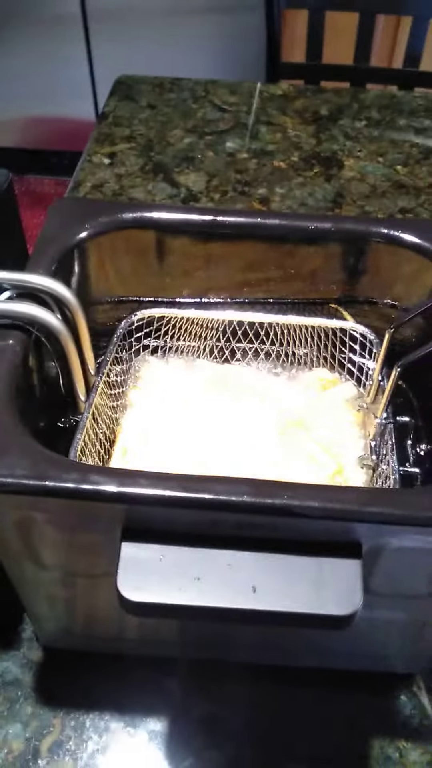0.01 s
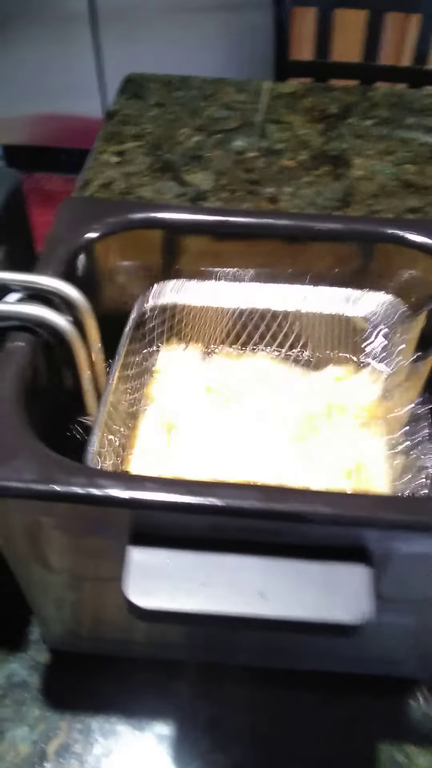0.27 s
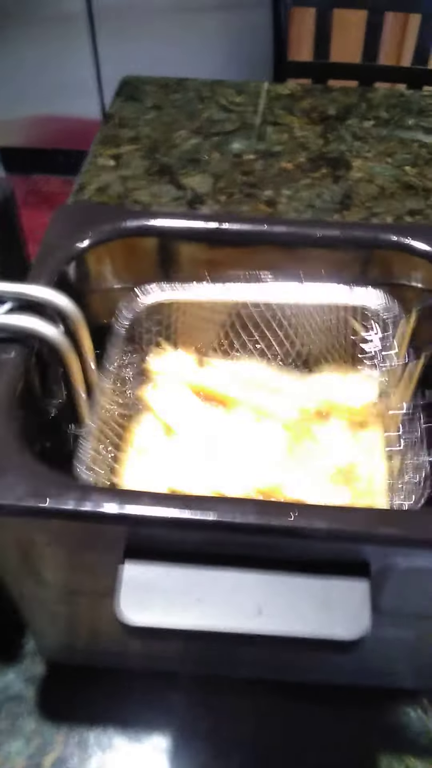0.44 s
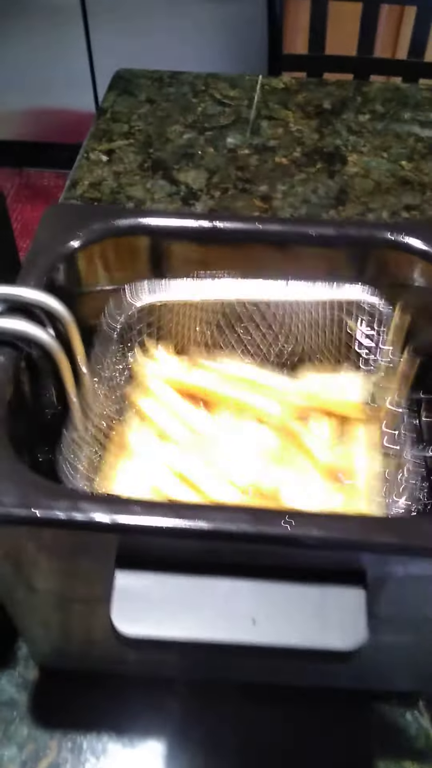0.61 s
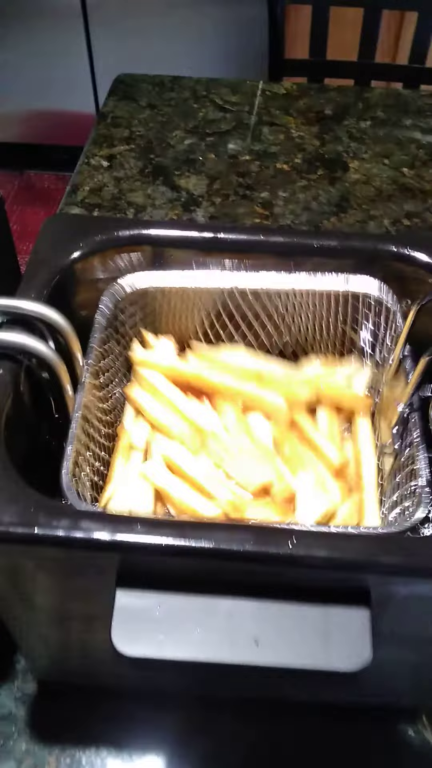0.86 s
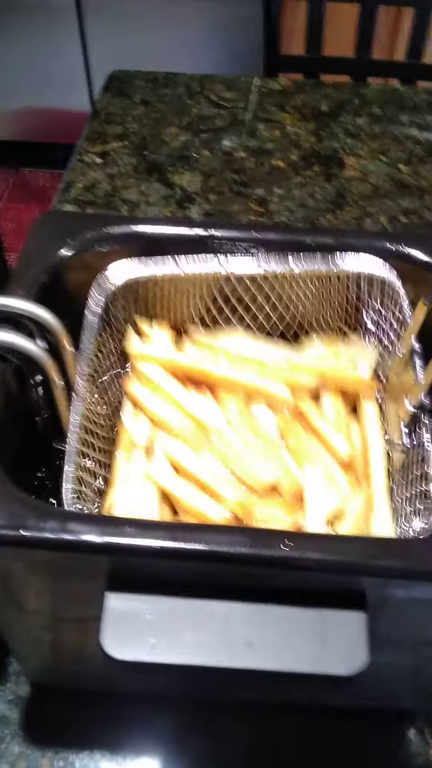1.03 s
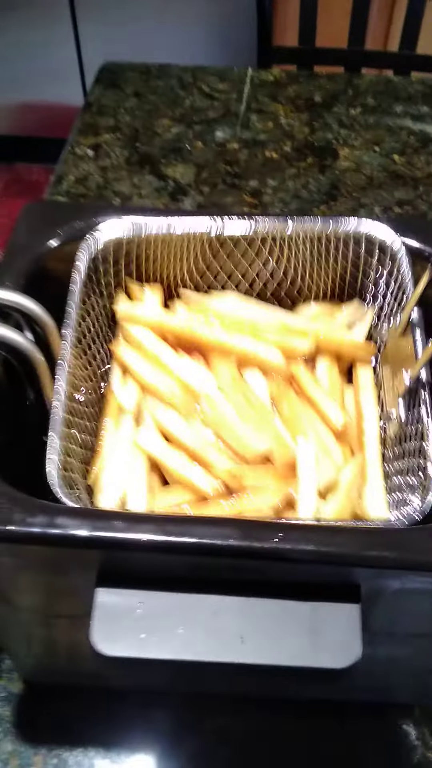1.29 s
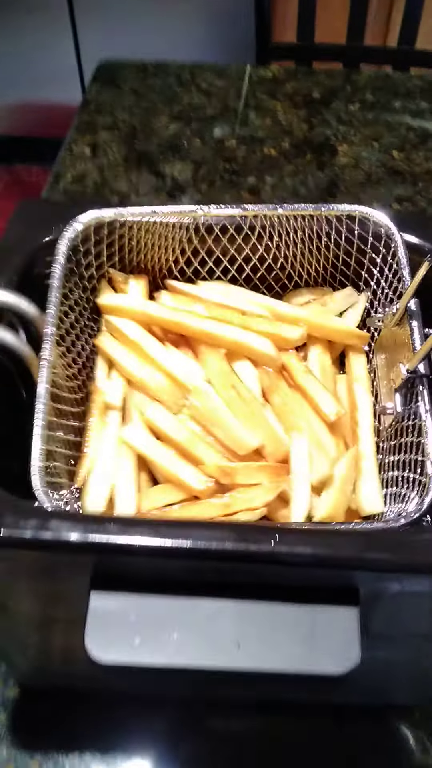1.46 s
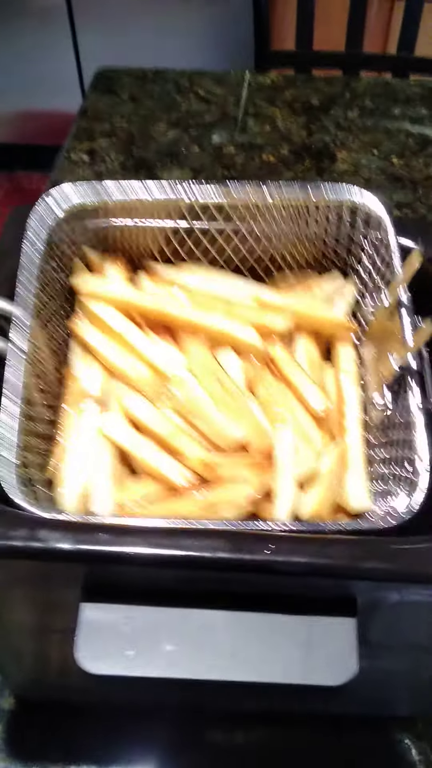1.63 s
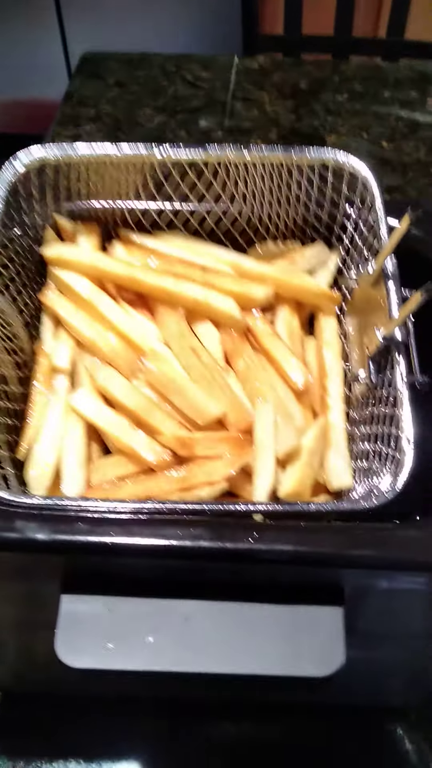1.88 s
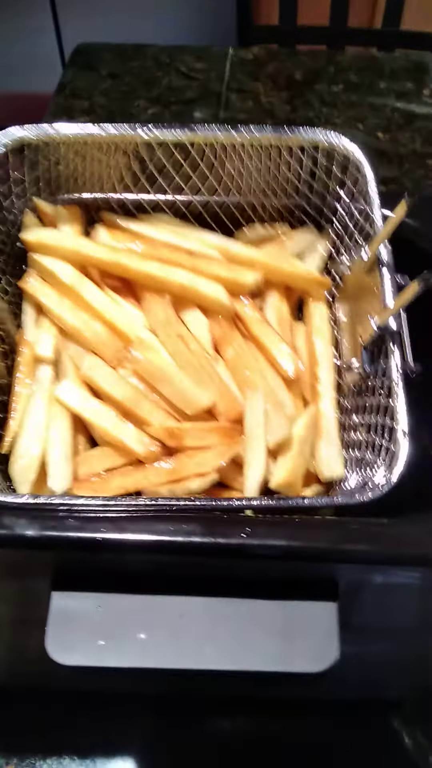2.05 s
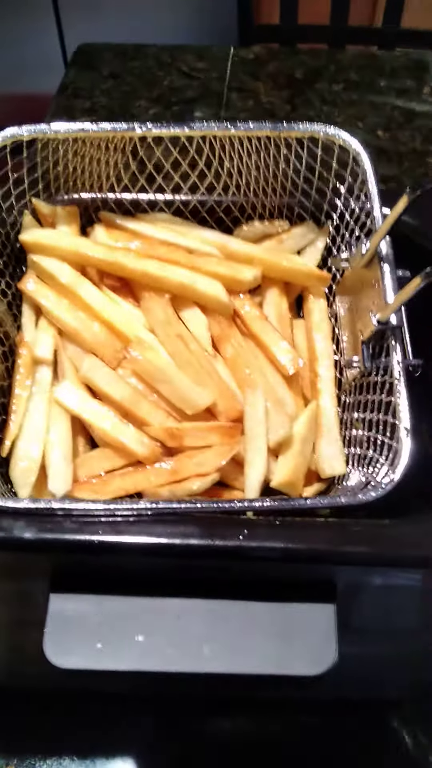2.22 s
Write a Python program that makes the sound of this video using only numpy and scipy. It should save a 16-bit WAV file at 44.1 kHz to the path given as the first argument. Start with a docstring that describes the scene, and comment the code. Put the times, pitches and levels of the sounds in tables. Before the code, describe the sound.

A wire fry basket knocks and rattles against a small steel fryer, close by in a kitchen, from about 0.2 to 1 second, its mesh buzzing and clicking. At 1.2 seconds the handle scrapes briefly, followed by two soft, low bumps and two light knocks near 1.5 seconds. Around 2 seconds the handle wires tick and ring. Hot oil hisses faintly throughout.

```python
"""A wire basket of fries is shaken in a small fryer, close by in a kitchen. Hot oil hisses throughout.
For the first second the basket knocks about: each knock is a quick chatter of tiny hits that rings
the steel tub and the rim and sets the mesh buzzing, with small clicks and slides among the knocks.
Then it is lifted out: a handle wire scrapes, two soft handling bumps follow, then two light knocks.
Last, around two seconds in, the handle wires tick and ring."""
import sys
import numpy as np
from scipy import signal
from scipy.fft import rfft, irfft, next_fast_len
from scipy.io import wavfile

SR = 44100
rng = np.random.default_rng(int(sys.argv[2]) if len(sys.argv) > 2 else 0)


def put_to_file(sound):
    """Save the sound as 16-bit audio at rate SR, in the file named by the first command-line argument."""
    columns = np.atleast_2d(sound).T  # one column per channel
    safe = np.clip(columns, -1, 1)
    whole_steps = np.round(safe * 32767)
    wavfile.write(sys.argv[1], SR, whole_steps.astype(np.int16))


N = 101429
T = np.arange(SR // 2) / SR  # seconds since the start of one short sound

# Basket knocks: start_s, tub_db, tub_hz, wall_db, rim_db, rim_hz, mesh_db, thud_db, hold_s
BASKET_KNOCKS = [(0.001, -62.5, 570, -69.5, -76.5, 2230, -96, -84, 0.058),
                 (0.2052, -40, 520, -47, -41, 2760, -47.5, -81, 0.011),
                 (0.2221, -36.5, 520, -43, -51, 2450, -46.5, -57, 0.013),
                 (0.256, -55, 530, -59.5, -80, 2460, -65, -70, 0.027),
                 (0.323, -47.5, 710, -53.5, -43, 2110, -41, -89, 0.0045),
                 (0.331, -40, 668, -67, -59, 2100, -54.5, -60.5, 0.013),
                 (0.4343, -31.5, 600, -39, -41.5, 2700, -41, -68, 0.0082),
                 (0.483, -78, 660, -50, -61, 2380, -58, -77, 0.012),
                 (0.555, -50, 635, -75, -45, 2250, -35.5, -61.5, 0.0069),
                 (0.567, -40.5, 690, -50.5, -52.5, 2610, -51.5, -63.5, 0.035),
                 (0.607, -42.5, 630, -59, -53.5, 2640, -58, -60, 0.015),
                 (0.6622, -30.5, 609, -39.5, -42, 2820, -36, -56.5, 0.0061),
                 (0.732, -59, 620, -46.5, -63, 2660, -77, -69.5, 0.0035),
                 (0.770, -79, 706, -60.5, -60, 2550, -84, -100, 0.021),
                 (0.956, -44, 660, -51.5, -53, 2840, -62, -76, 0.0078),
                 (0.9755, -41.5, 670, -46.5, -47.5, 2710, -57, -86, 0.0076),
                 (0.996, -48, 590, -58.5, -64, 2420, -64, -82, 0.0026),
                 (1.032, -79, 630, -63.5, -66, 2700, -66, -69.5, 0.012),
                 (1.508, -57.5, 610, -69, -65.5, 2790, -90, -68, 0.016),
                 (1.535, -59, 457, -80, -65, 2230, -71.5, -68, 0.011)]
# Mesh wires slipping past each other: start_s, level_db, pitch_hz, width_hz
MESH_CLICKS = [(0.206, -57, 13100, 5000), (0.224, -45.5, 4300, 1100), (0.434, -59, 14000, 3500),
               (0.559, -43.5, 9800, 2200), (0.9757, -44.5, 7720, 1840)]
# Mesh and fries sliding: start_s, hold_s, level_db, pitch_hz, width_hz
LIGHT_SLIDES = [(0.196, 0.006, -58, 2640, 705), (0.949, 0.03, -59.5, 7870, 1710),
                (1.176, 0.0033, -56.5, 6170, 1510), (1.18, 0.031, -64.5, 7840, 2480),
                (1.504, 0.056, -65, 970, 338), (0.699, 0.25, -72.5, 2430, 1080),
                (1.583, 0.12, -80, 1080, 200)]
# Handle scrapes and ticks: start_s, level_db, pitch_hz, hold_s, ring_db, fizz_db, wall_db
HANDLE_TICKS = [(1.2122, -45, 2600, 0.02, -69, -65, -67.5), (1.846, -57, 2580, 0.016, -68, -71.5, -80),
                (1.946, -51, 2350, 0.017, -45, -62.5, -58.5), (1.964, -49.5, 2270, 0.0076, -37, -67, -64),
                (1.976, -47, 2390, 0.0018, -43.5, -78, -65), (1.994, -55.5, 2360, 0.024, -65, -75, -78),
                (2.021, -55, 2690, 0.017, -48, -88, -68.5), (2.182, -52.5, 2310, 0.017, -46, -71, -80)]
# Handling bumps: start_s, length_s, tone_db, pitch_hz, rub_db
HANDLING_BUMPS = [(1.249, 0.11, -60, 75.6, -50.5), (1.364, .11, -48.5, 65.5, -59)]

# The notes each metal part rings at: pitch_hz, relative_db, fade_s (a fade is the time to drop 60 dB)
TUB_NOTES = [(430, -10, .1), (475, -2, .13), (535, -4, .14), (572, -7, .11), (611, -5, .12), (655, -6, .1),
             (705, 0, .14), (753, -2, .14), (1060, -10, .17), (1201, -5, .17), (1343, -6, .2),
             (1415, -9, .2), (1517, -8, .22), (2114, -10, .16)]
MESH_NOTES = [(4250, 3, 0.03), (5150, 3, 0.03), (5550, -4, .06), (6970, -1, 0.04), (7760, 0, .04)]
HANDLE_NOTES = [(797, -13.5, .29), (850, -17, .2), (925, -17, .17), (1128, -21, .2), (1700, -18, .08),
                (2037, 0, .11), (2175, -5, .09), (2298, -2.5, .09), (2500, -2, .1), (2666, -10, .09),
                (3010, -14, .12)]

# The colour of each noise, or how strong it is from low to high: frequency_hz, relative_db
WALL_COLOUR = [(100, -26), (340, -21), (470, 1), (750, -1), (880, -4.5), (1300, -2), (1850, -8.5),
               (3000, -10.5), (6000, -48)]
MESH_COLOUR = [(400, -50), (1200, -22), (1650, 1), (2300, -7), (3700, -1.5), (5400, 2.5), (6600, -1),
               (7800, 3.5), (9000, -6), (10200, -10), (11500, -15), (16000, -27)]
THUD_COLOUR = [(20, -38), (50, 3.5), (110, 0), (250, -2.5), (370, -2), (550, -14), (1200, -49)]
RUB_COLOUR = [(20, -13), (75, 6), (150, -3.5), (240, -13), (400, -35), (1000, -55)]
OIL_COLOUR = [(20, -31), (60, -4.5), (130, -6), (300, -2.5), (700, -6.5), (1050, -14.5), (1450, -5.5),
              (1850, -18), (2300, -12.5), (2850, -3.5), (3400, -13.5), (4300, -9), (5500, -6.5),
              (6700, -11), (8100, -7.5), (9500, -15), (12000, -24), (14000, -41)]

# How long the kitchen echoes: frequency_hz, fade_s
ECHO_FADES = [(100, 0.13), (600, 0.19), (2500, 0.27), (7500, 0.26), (14000, 0.51)]
# How strongly it echoes: frequency_hz, relative_db
ECHO_LEVELS = [(100, -40), (600, -4.5), (2500, -8.5), (7500, -2), (14000, -6)]

WALL_FADE_S, TICK_FADE_S = 0.098, 0.07
CONTACTS_PER_S, SPITS_PER_S = 750, 130


def basket_knocks():
    """Each knock rings the tub, its thin walls, the rim and the mesh, and thuds into the counter."""
    out = np.zeros(N)
    for start_s, tub_db, tub_hz, wall_db, rim_db, rim_hz, mesh_db, thud_db, hold_s in BASKET_KNOCKS:
        # Tub notes close to tub_hz stand out by up to 17 dB.
        notes = [(hz, db + 17 / (1 + ((hz - tub_hz) / 124) ** 2), fade_s) for hz, db, fade_s in TUB_NOTES]
        tub = amp(tub_db) * ring(notes, attack_s=0.004, scatter_db=3, waver=5.04)
        thud = amp(thud_db) * chatter(curve(THUD_COLOUR), hold_s, fade_s=0.19)
        wall = amp(wall_db) * chatter(curve(WALL_COLOUR), hold_s, WALL_FADE_S)
        rim = amp(rim_db) * chatter(band(rim_hz, width_hz=430), hold_s, fade_s=0.051)
        mesh = mesh_buzz(mesh_db, hold_s)
        add(out, start_s, kitchen(tub) + kitchen(thud + wall + rim) + kitchen(mesh, paths=5))
    return out


def mesh_buzz(level_db, hold_s):
    """The struck mesh gives a bright snap, buzzes, and its wires ring."""
    wires = amp(-13) * ring(MESH_NOTES, attack_s=0.00043, scatter_db=3, waver=34)
    snap = amp(-10) * chatter(mesh_colour(level_db + 16), hold_s=0, fade_s=0.015)
    buzz = chatter(mesh_colour(level_db), hold_s, fade_s=0.033)
    return amp(level_db) * (snap + buzz + wires)


def mesh_colour(level_db):
    """The harder the hit, the higher the mesh's buzz reaches."""
    octaves_up = 0.06 * max(level_db + 51, -5)
    edge_hz = 10000 * 2 ** octaves_up
    return lambda hz: curve(MESH_COLOUR)(hz) - 10 * np.log10(1 + (hz / edge_hz) ** 10)


def mesh_clicks():
    """Mesh wires catch and let go with a crisp, bright click."""
    out = np.zeros(N)
    for start_s, level_db, pitch_hz, width_hz in MESH_CLICKS:
        click = amp(level_db) * chatter(band(pitch_hz, width_hz), hold_s=0.0016, fade_s=0.031)
        add(out, start_s, kitchen(click, paths=4))
    return out


def handle_ticks():
    """The handle wires slip in their seats in short, rough ticks and ring on."""
    out = np.zeros(N)
    rise = 1 - np.exp(-T / 0.0033)  # softens the start of each tick
    for start_s, level_db, pitch_hz, hold_s, ring_db, fizz_db, wall_db in HANDLE_TICKS:
        slip = amp(level_db) * chatter(band(pitch_hz, width_hz=840), hold_s, TICK_FADE_S)
        fizz = amp(fizz_db) * chatter(mesh_colour(fizz_db), hold_s, TICK_FADE_S)
        wall = amp(wall_db) * chatter(curve(WALL_COLOUR), hold_s, WALL_FADE_S)
        wires = amp(ring_db) * ring(HANDLE_NOTES, attack_s=0.002, scatter_db=2, waver=6)
        add(out, start_s, kitchen((slip + fizz + wall + wires) * rise, echo_db=-4.5))
    return out


def handling_bumps():
    """Handling makes soft, low swells: a tone that sinks in pitch, with a dull rub."""
    out = np.zeros(N)
    for start_s, length_s, tone_db, pitch_hz, rub_db in HANDLING_BUMPS:
        swell = np.sin(np.pi * np.minimum(T / length_s, 1)) ** 2
        sinking_hz = pitch_hz * np.exp(-3 * (T - length_s / 2))
        tone = np.sqrt(2) * np.sin(2 * np.pi * np.cumsum(sinking_hz) / SR)
        rub = unit(coloured(rng.standard_normal(len(T)), curve(RUB_COLOUR)))
        add(out, start_s, swell * (amp(tone_db) * tone + amp(rub_db) * rub))
    return out


def light_slides():
    """Mesh and fries slide with a light scratch between the knocks."""
    out = np.zeros(N)
    for start_s, hold_s, level_db, pitch_hz, width_hz in LIGHT_SLIDES:
        scratch = amp(level_db) * chatter(band(pitch_hz, width_hz), hold_s, fade_s=0.065)
        add(out, start_s, kitchen(scratch))
    return out


def hot_oil():
    """Hot oil hisses steadily over the room's own faint noise; tiny random spits add a sizzle."""
    hiss = coloured(rng.standard_normal(N + len(T)), curve(OIL_COLOUR))[len(T):]
    spits = (rng.random(N) < SPITS_PER_S / SR) * rng.standard_normal(N)
    sizzle = coloured(spits, band(pitch_hz=6400, width_hz=1900))
    return amp(-72) * unit(hiss) + amp(-87) * unit(sizzle)


def kitchen(sound, echo_db=0, paths=1):
    """Add the room's echo, keeping the loudness. Several paths make it smoother and less ringing."""
    hz, seconds, noise = signal.stft(rng.standard_normal((paths, len(T))), SR, nperseg=256)
    fade_s = curve(ECHO_FADES)(hz)[:, None]
    fade = amp(echo_db + curve(ECHO_LEVELS)(hz)[:, None] - 60 * seconds / fade_s)
    fade *= np.sqrt(2 * np.log(1000) / (fade_s * SR))  # a longer echo gets no extra energy
    tails = signal.istft(noise * fade, SR, nperseg=256)[1][:, :len(T)]
    tails *= np.minimum(T / 0.00098, 1)
    # The paths take turns carrying the sound, handing over every 2 ms.
    turns = np.exp(paths * np.cos(2 * np.pi * (T / 0.002 - np.arange(paths)[:, None]) / paths))
    shares = sound * turns / np.linalg.norm(turns, axis=0)
    echoing = sound + signal.fftconvolve(shares, tails, axes=1).sum(0)[:len(T)]
    return echoing * np.linalg.norm(sound) / np.linalg.norm(echoing)


def chatter(colour, hold_s, fade_s):
    """A first blow and many tiny hits spread through the woven wire; they hold, then die away."""
    loudness = amp(-60 * np.maximum(T - hold_s, 0) / fade_s)
    contacts = (rng.random(len(T)) < CONTACTS_PER_S / SR) * np.sign(rng.standard_normal(len(T)))
    contacts[0] = 1
    weave = rng.standard_normal(len(T)) * amp(-60 * T / 0.0098)  # smears each hit over about 10 ms
    rattle = unit(signal.fftconvolve(contacts, weave)[:len(T)])
    buzz = 0.62 * rng.standard_normal(len(T))
    burst = coloured(loudness * (rattle + buzz), colour)
    return burst * np.linalg.norm(loudness) / np.linalg.norm(burst)


def ring(notes, attack_s, scatter_db, waver):
    """Struck metal rings at several fading notes, each with a random strength and a slight waver."""
    hz, db, fade_s = np.transpose(notes)[:, :, None]
    gain = amp(db + scatter_db * rng.standard_normal(hz.shape))
    phase = 2 * np.pi * (hz * T + rng.random(hz.shape))
    drift = waver * np.cumsum(rng.standard_normal((len(hz), len(T))), axis=1) / np.sqrt(SR)
    waves = gain / np.linalg.norm(gain) * amp(-60 * T / fade_s) * np.sin(phase + drift)
    return np.sqrt(2) * waves.sum(0) * (1 - np.exp(-T / attack_s))


def coloured(sound, colour):
    """Filter a sound by a colour: a function that gives a gain in dB for each frequency."""
    size = 2 * next_fast_len(len(sound) // 2 + 2048)
    gain = np.maximum(amp(colour(np.fft.rfftfreq(size, 1 / SR))), 1e-6)
    log_response = irfft(np.log(gain), size)
    # Fold the filter forward in time, so nothing rings before its hit.
    log_response[1:size // 2] *= 2
    log_response[size // 2 + 1:] = 0
    return irfft(rfft(sound, size) * np.exp(rfft(log_response)), size)[:len(sound)]


def curve(points):
    """Join (frequency_hz, value) points into a curve that can be read at any frequency."""
    points_hz, values = np.transpose(points)
    return lambda hz: np.interp(np.log(hz + 1), np.log(points_hz + 1), values)


def band(pitch_hz, width_hz):
    """A colour that is strong around one pitch and drops steeply on both sides."""
    return lambda hz: -10 * np.log10(1 + np.abs(2 * (hz - pitch_hz) / width_hz) ** 4.21)


def amp(db):
    """Turn decibels into a number to multiply by."""
    return 10 ** (np.asarray(db) / 20)


def unit(sound):
    """Scale a sound to an average (rms) level of 1."""
    return sound / np.sqrt(np.mean(sound ** 2) + 1e-20)


def add(track, start_s, sound):
    """Mix a sound into the track at its start time."""
    first = round(start_s * SR)
    track[first:first + len(sound)] += sound[:N - first]


def scene():
    """All the sources together in one channel."""
    mix = basket_knocks() + mesh_clicks() + light_slides() + handle_ticks() + handling_bumps() + hot_oil()
    return mix[None]


def record(dry):
    """Cut away the very highest treble."""
    top_hz = 16400
    size = next_fast_len(N + len(T))
    kept = np.fft.rfftfreq(size, 1 / SR) < top_hz
    return irfft(rfft(dry, size) * kept, size)[:, :N]


dry = scene()
out = record(dry)
put_to_file(out)
```